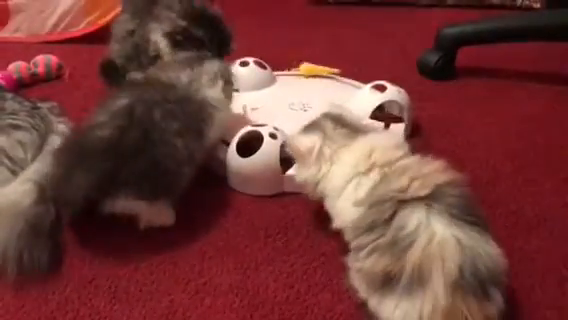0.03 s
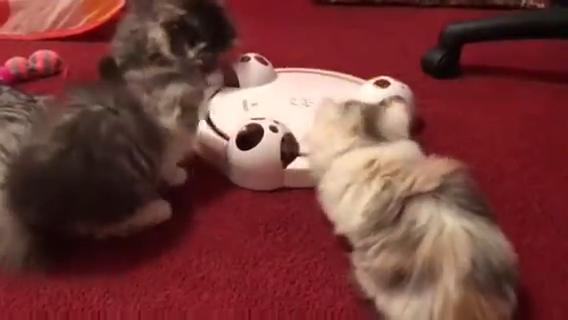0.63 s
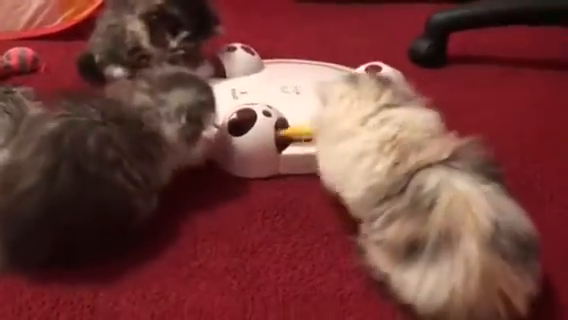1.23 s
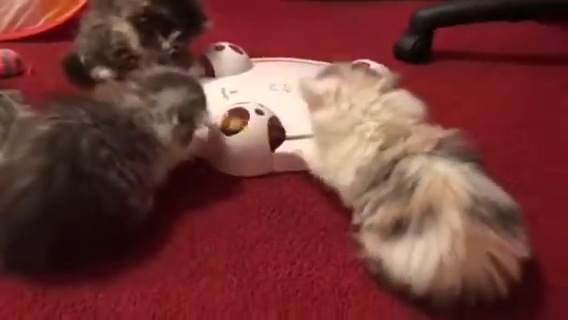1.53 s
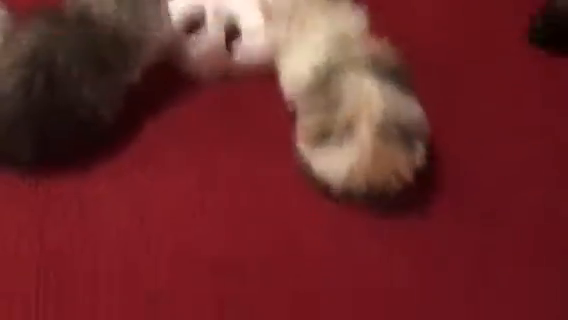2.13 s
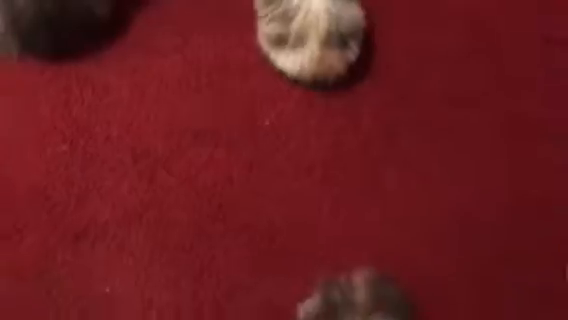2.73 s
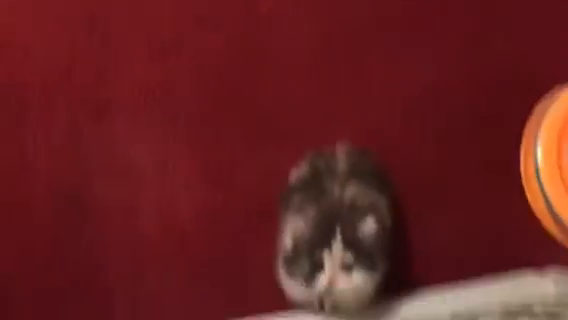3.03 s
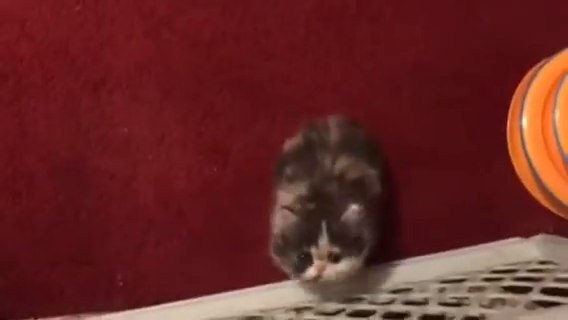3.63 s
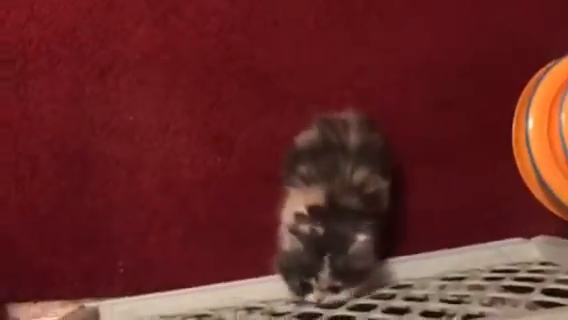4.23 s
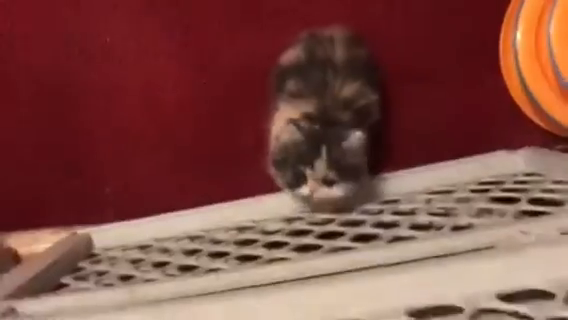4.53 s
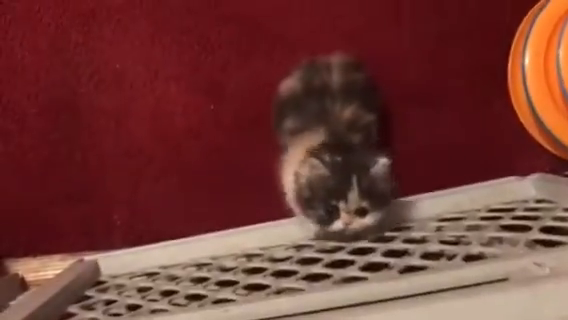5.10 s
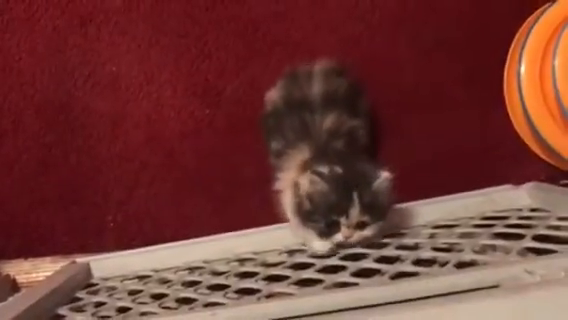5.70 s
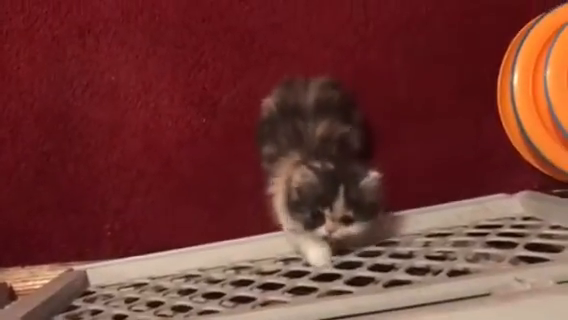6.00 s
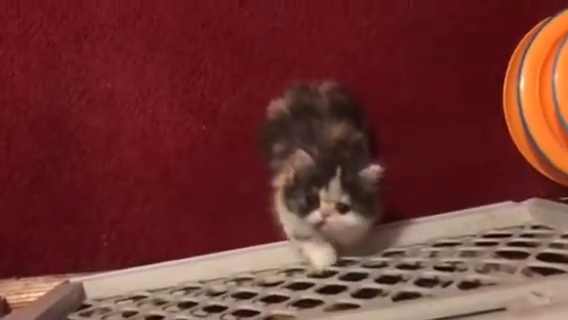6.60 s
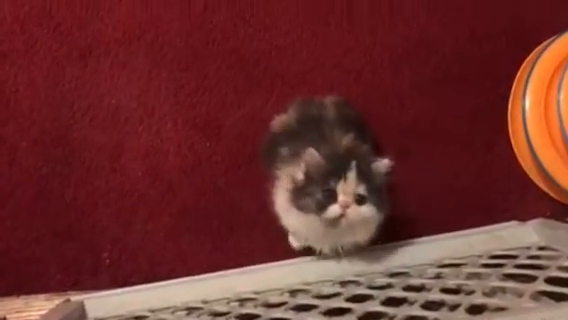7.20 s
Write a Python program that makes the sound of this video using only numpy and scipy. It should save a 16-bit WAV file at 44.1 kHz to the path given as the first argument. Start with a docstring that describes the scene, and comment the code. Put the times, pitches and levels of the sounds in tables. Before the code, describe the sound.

A small motorised toy whirs quietly with light plastic taps, broken by close microphone handling knocks, then soft scratches on a plastic gate.

```python
"""A motorised cat toy whirs on the carpet of a small room, its gear train buzzing in a plastic shell
while kittens bat at it and its loose wand rattles. The microphone is a hand-held phone nearby, which
swings round to a kitten pawing and scratching a plastic pet gate. Right at the microphone the grip
shifts: soft thumps, a short finger slide, rasping skin and sharp knocks on the case.
Low room tone lies underneath."""
import sys
import numpy as np
from scipy import signal
from scipy.fft import rfft, irfft, next_fast_len
from scipy.io import wavfile
from scipy.ndimage import uniform_filter1d, map_coordinates

SR = 44100
rng = np.random.default_rng(int(sys.argv[2]) if len(sys.argv) > 2 else 0)


def store_pcm(level_fs):
    """Save levels as 16-bit WAV."""
    pcm = np.round(np.clip(level_fs, -1, 1) * 32767).astype(np.int16)
    wavfile.write(sys.argv[1], SR, np.atleast_2d(pcm).T)


N = 324135
TIME = np.arange(N) / SR
HIT = 8192  # samples in one blow
TURN_MIDDLE_S, TURN_LENGTH_S = 2.8, 0.73  # the phone's swing from toy to gate

# resonances of the toy's plastic shell: f/Hz, gain/dB
TOY_SHELL = [(300, -16), (620, -9.5), (720, 1), (860, -14.5), (1040, -1), (1190, -8), (1350, 1),
             (1640, 4.5), (1800, -11), (2100, -22.5), (2780, -10.5), (3150, -19.5), (3700, -30),
             (7000, -47)]


def toy_motor(shaft_hz=43.7, pinion_teeth=6, wobble=0.004):
    """Loose gear teeth click into the shell, harder twice a turn; motor hum and gear whine sit beneath."""
    # course of the gear whir: t/s, relative level/dB
    whir_levels = [(0.0, -56.5), (0.37, -60.5), (0.57, -56.5), (2.19, -60), (2.83, -54.5), (3.13, -60),
                   (7.35, -60.5)]
    # partials of the motor hum: f/Hz, level/dB
    hum_partials = [(129.6, -64), (175, -70), (220, -68), (262, -88), (393, -74), (567, -77), (1550, -69),
                    (1642, -70), (5330, -100)]
    # partials of the gear whine: f/Hz, relative level/dB
    whine_partials = [(721, -4.5), (818, -17.5), (1049, 0), (1152, -23)]
    motor_time = np.cumsum(1 + wobble * (wander(9) + wander(1.5)) / 2) / SR
    turns = shaft_hz * motor_time
    backlash = 0.16 * wander(130)  # each tooth lands early or late
    meshes = np.diff(np.floor(turns * pinion_teeth + backlash), prepend=0)
    teeth = unit(meshes * undb(rng.uniform(-14, 0, N)))
    rubbing = undb(-1) * rng.standard_normal(N)
    eccentric = 1 + 0.17 * np.cos(4 * np.pi * turns)
    load = eccentric * undb(2.5 * wander(24))
    whir = unit(colour((teeth + rubbing) * load, TOY_SHELL))
    whir *= undb(np.interp(TIME, *np.transpose(whir_levels)) + 1)
    hum = sum(undb(db) * partial(hz * motor_time, spread=0.61, rate_hz=18) for hz, db in hum_partials)
    whine = sum(undb(db) * partial(hz * motor_time, spread=0.55, rate_hz=17)
                for hz, db in whine_partials)
    whine_db = -72.5 + 8.5 * turned(TIME)  # louder once the phone has swung round
    return whir + hum + whine * undb(whine_db)


def partial(cycles, spread, rate_hz):
    """A motor or gear tone of rms near 1 whose strength and phase flutter with the load."""
    flutter = 1 + spread * (wander(rate_hz) + 1j * wander(rate_hz))
    return np.sqrt(2) * unit(np.abs(flutter)) * np.sin(2 * np.pi * cycles + np.angle(flutter))


def toy_taps():
    """Paws and wand strike the toy's shell: a brief tap is bright, a longer one duller."""
    # blows on the shell: t/s, level/dB, rattle decay/s
    taps = [(.142, -47.5, 0.004), (0.635, -46.5, 0.029), (.679, -39, 0.0077), (.737, -38, .018),
            (.942, -42.5, 0.00076), (1.057, -43, 0.0015), (1.138, -48, 0.0067), (1.263, -46.5, 0.0026),
            (1.345, -49, 0.006), (1.931, -47.5, 0.0046), (2.362, -47.5, 0.011), (2.502, -40, 0.0075),
            (2.575, -36, 0.0042), (2.582, -48, 0.013), (2.601, -42.5, .0095), (2.688, -39.5, 0.01),
            (2.95, -42.5, 0.016)]
    out = np.zeros(N)
    for s, db, rattle_s in taps:
        tilt = 1 - 1.56 * np.log2(rattle_s / 0.0021)
        add(out, s, colour(contact(rattle_s, chatter=0.092), TOY_SHELL, tilt), db)
    return out


def wand_rattle(count=64):
    """The loose, circling wand clicks in the shell at random, fainter as the microphone turns away."""
    out = np.zeros(N)
    for k, (when, softness) in enumerate(rng.random((count, 2))):
        s = (k + when) / count * N / SR
        db = -51 - 5.5 * turned(s) - 5 * softness
        add(out, s, colour(contact(0.0054, chatter=0.22), TOY_SHELL, tilt_db_per_octave=3.5), db)
    return out


def gate_taps(scuff_db=2):
    """The gate's plastic lattice rings briefly under claws, nose and scuffing paws."""
    # touches on the gate: t/s, level/dB, rattle decay/s
    taps = [(3.496, -41.5, .0044), (5.114, -46, 0.0085), (5.317, -39, 0.024), (5.490, -42.5, 0.014),
            (5.519, -37.5, 0.012), (5.569, -47.5, 0.025), (6.244, -42, 0.038), (6.899, -49, 0.0038)]
    # modes of the lattice: f/Hz, relative level/dB, t60/s
    modes = [(694, 3.5, 0.067), (736, -3, 0.048), (795, -14, 0.017), (982, -3.5, 0.1), (1125, 1, 0.032),
             (1242, 2.5, 0.065), (1520, -3, 0.064), (1780, -19, 0.012), (2760, -5, 0.021),
             (3130, -13, 0.033), (4330, -39, 0.0091)]
    # dry scuff of a paw: f/Hz, gain/dB
    scuff = [(300, -26), (560, -11), (700, 10.5), (900, -1.5), (1150, -5), (1600, -1.5), (2000, -22),
             (2800, -8), (3500, -29), (8000, -43)]
    out = np.zeros(N)
    for s, db, rattle_s in taps:
        push = contact(rattle_s, chatter=0.048)
        tap = unit(ring(push, modes)) + undb(scuff_db) * unit(colour(push, scuff))
        add(out, s, colour(tap, [(400, -22), (650, 0.5), (6000, -11)]), db)
    return out


def fur_brush():
    """Fur brushes past the gate in one soft hiss."""
    # the stroke: t/s, length/s, level/dB
    brush = [(5.22, 0.04, -53.5)]
    # fur on plastic: f/Hz, gain/dB
    fur = [(500, -5), (1400, 12), (2000, -6), (2800, 6), (4200, -20), (6000, -13), (8000, -24),
           (14000, -30)]
    return unit(colour(rng.standard_normal(N), fur)) * strokes(brush, attack_s=0.035, sag_db_per_s=0)


def claw_scratches(ring_hz=2735):
    """Claw tips scrape briefly over plastic."""
    # light scratches: t/s, level/dB
    scratches = [(3.707, -49.5), (3.78, -48.5), (4.026, -46), (5.557, -50), (6.422, -52), (6.501, -46),
                 (6.546, -50.5)]
    # spectrum of a scratch: f/ring_hz, gain/dB
    claw = [(.22, -2), (.44, 10.5), (.7, 6.5), (.84, -15), (1.0, 8), (1.2, -9), (1.45, -31), (3.3, -35)]
    out = np.zeros(N)
    for s, db in scratches:
        add(out, s, colour(contact(0.0044, chatter=0.7), np.array(claw) * [ring_hz, 1]), db)
    return out


def case_knocks(ring_db=-3):
    """Fingers knock on the phone, right at the microphone: a dry click and the ring of the case."""
    # knocks: t/s, level/dB, rattle decay/s, treble tilt/(dB per octave)
    knocks = [(2.707, -30, 0.011, -3), (2.717, -23.5, .013, -6), (2.746, -37, 0.027, -6),
              (2.81, -45, 0.012, 8.5), (4.3137, -19, 0.00053, 2.5), (4.446, -33.5, 0.003, 9),
              (4.470, -26, 0.0012, -7.5), (4.4727, -13, 0.0059, -1.5), (4.479, -24.5, 0.0095, -2.5),
              (4.498, -30.5, 0.0098, -1.5)]
    # modes of the case: f/Hz, relative level/dB, t60/s
    modes = [(430, -15.5, 0.04), (672, -6, 0.062), (900, 7.5, 0.0072), (1196, 3, 0.02), (1270, 8, 0.014),
             (1509, 7, 0.027), (1532, 3.5, 0.073), (1900, -7, 0.058), (2180, -5.5, 0.032),
             (2480, -13, 0.027), (2830, -11, 0.023), (2925, -1, 0.028), (3750, -24, 0.033),
             (3700, -15, 0.021), (4770, -16, 0.016), (6900, -37, .04)]
    # dry click of a touch: f/Hz, gain/dB
    click = [(150, -4), (300, -19), (420, -13), (800, -20.5), (1150, -1), (1450, 6), (1760, -28),
             (2000, -15), (2750, -5.5), (3300, -13), (4300, -24), (5700, -34.5), (7100, -36), (15000, -49)]
    body = [(60, -7.5), (200, 7.5), (600, 6), (1500, 5.5), (15000, -6)]  # f/Hz, gain/dB
    out = np.zeros(N)
    for s, db, rattle_s, tilt in knocks:
        push = contact(rattle_s, chatter=0.12)
        knock = unit(colour(push, click)) + undb(ring_db) * unit(ring(push, modes))
        add(out, s, colour(knock, body, tilt), db)
    return out


def hand_thumps(swell_cycles=0.67, flesh_db=-11):
    """The hand's weight pushes through the phone; each low thump swells and dies in a few cycles."""
    # shifts of the grip: t/s, level/dB, f/Hz
    thumps = [(0.655, -42.5, 75.6), (0.768, -38.5, 66.4), (1.425, -33.5, 66), (1.596, -43, 75.5),
              (2.261, -39, 65), (2.352, -44.5, 58.5), (2.713, -42, 96), (2.845, -36, 61.3),
              (3.002, -41.5, 64), (3.078, -41.5, 64), (3.637, -43, 99), (4.312, -27.5, 84),
              (4.365, -34, 79), (4.401, -31, 49), (4.456, -21.5, 85), (4.473, -26.5, 63.6)]
    flesh_colour = [(20, -7.5), (60, -13.5), (150, 1.5), (300, -21.5), (1500, -65)]  # f/Hz, gain/dB
    out = np.zeros(N)
    for s, db, hz in thumps + fidgets():
        age = TIME[:HIT] * hz / swell_cycles
        flesh = undb(flesh_db) * unit(colour(rng.standard_normal(HIT), flesh_colour))
        add(out, s, age * np.exp(-age) * (np.sin(2 * np.pi * hz * TIME[:HIT]) + flesh), db)
    return out


def fidgets(count=12, from_s=0.9, db=-47.5, hz=70):
    """The restless hand adds faint, uneven thumps until mid-swing: rows of t/s, level/dB, f/Hz."""
    step_s = (TURN_MIDDLE_S - from_s) / count
    return [(from_s + (k + when) * step_s, db + 3.5 * (2 * force - 1), hz * 2 ** (pitch - 0.5))
            for k, (when, force, pitch) in enumerate(rng.random((count, 3)))]


def finger_slide():
    """A finger slides a short way along the phone case."""
    # the slide: t/s, length/s, level/dB
    slide = [(4.312, 0.097, -32)]
    # skin on the case: f/Hz, gain/dB
    spectrum = [(59, -24), (100, 3), (339, -13.5), (416, -4.5), (545, -20.5), (698, -10), (914, -27),
                (1030, -9.5), (1170, -19.5), (1440, -5), (1660, -30), (2270, -28), (2570, -19.5),
                (3650, -43), (14000, -62.5)]
    return rub(slide, spectrum, sag_db_per_s=52)


def port_rasp():
    """Skin rasps straight over the microphone port as the grip shifts."""
    # rasps: t/s, length/s, level/dB
    rasps = [(2.715, 0.039, -43.5), (4.442, 0.027, -43), (4.469, 0.047, -21)]
    # skin on the port: f/Hz, gain/dB
    spectrum = [(500, -11.5), (1200, 11.5), (1480, 13), (1750, -5), (2800, 12), (3400, -10), (4500, 0.5),
                (5600, -26.5), (7000, -12.5), (9500, -24), (15000, -30)]
    return rub(rasps, spectrum, sag_db_per_s=458)


def faint_ticks(count=14, db=-68, spread_db=2):
    """Now and then something in the room gives a tiny high tick."""
    # spectrum of a tick: f/Hz, gain/dB
    spectrum = [(1000, -25), (3500, -6), (5200, 8), (7000, 0), (9000, -14), (15000, -7)]
    out = np.zeros(N)
    for when, force in rng.random((count, 2)):
        tick = colour(contact(0.0004, chatter=0.25), spectrum)
        add(out, when * N / SR, tick, db + spread_db * (2 * force - 1))
    return out


def walls(x, t60_s=0.077, wet_db=-9):
    """The small carpeted room adds a short tail, starting 6 ms after the direct sound."""
    age = TIME[:2 * HIT]
    tail = rng.standard_normal(len(age)) * np.exp(-np.log(1000) * age / t60_s) * (age > 0.006)
    response = colour(unit(tail) / np.sqrt(len(age)), [(2000, 0), (10000, -0.5)])
    return x + undb(wet_db) * signal.fftconvolve(x, response)[:N]


def room_tone(level_db=-56.5, swell_db=3):
    """A low, gently swelling rumble under an even hiss."""
    # noise of the room: f/Hz, relative spectral density/dB
    spectrum = [(15, -15.5), (30, -4), (55, -0.5), (130, -2), (200, -5), (300, -10), (500, -16),
                (1200, -12.5), (2200, -26.5), (3800, -38), (7500, -42), (15500, -40.5)]
    air = unit(colour(rng.standard_normal(N), spectrum))
    rumble = signal.sosfiltfilt(signal.butter(2, 250, fs=SR, output="sos"), air)
    return undb(level_db) * (air + rumble * (undb(swell_db * wander(4.47)) - 1))


def contact(rattle_s, chatter):
    """One sharp touch, then dying micro-impacts as the surfaces settle."""
    push = chatter * rng.standard_normal(HIT) * rng.exponential(size=HIT)
    push *= np.exp(-TIME[:HIT] / rattle_s)
    push[0] += 1
    return push


def ring(push, modes, scatter_db=1):
    """Drive decaying modes; each blow lands elsewhere and weights them anew."""
    hz, db, t60 = np.transpose(modes)[:, :, None]
    weight = undb(db + scatter_db * rng.standard_normal(hz.shape)) * rng.choice([-1, 1], hz.shape)
    response = weight * np.sin(2 * np.pi * hz * TIME[:HIT]) * np.exp(-np.log(1000) * TIME[:HIT] / t60)
    return signal.fftconvolve(push, response.sum(0))[:HIT]


def rub(rows, spectrum, sag_db_per_s, slip_db=5):
    """Skin sticks and slips in tiny uneven steps."""
    slips = rng.standard_normal(N) * undb(slip_db * rng.standard_normal(N))
    return unit(colour(slips, spectrum)) * strokes(rows, attack_s=0.0035, sag_db_per_s=sag_db_per_s)


def strokes(rows, attack_s, sag_db_per_s, lift_db_per_s=3998):
    """Envelope of strokes that bite, weaken as the pressure eases and stop on lifting."""
    out = np.zeros(N)
    for s, length_s, db in rows:
        age = np.clip(TIME - s, 0, 1)
        sag_db = sag_db_per_s * np.maximum(age - attack_s, 0)
        lift_db = lift_db_per_s * np.maximum(age - length_s, 0)
        out += np.minimum(age / attack_s, 1) * undb(db - np.minimum(sag_db + lift_db, 200))
    return out


def turned(s):
    """How far the microphone has swung from toy to gate, 0-1."""
    return np.clip(0.5 + (s - TURN_MIDDLE_S) / TURN_LENGTH_S, 0, 1)


def colour(x, points, tilt_db_per_octave=0):
    """Causal filter through (f/Hz, gain/dB) points, tilted about 1500 Hz."""
    size = 2 * next_fast_len(len(x))
    hz = np.maximum(np.arange(size // 2 + 1) * SR / size, 1)
    corners, db = np.transpose(points)
    octaves = np.log2(np.clip(hz, 600, 3600) / 1500)
    gain_db = np.interp(np.log(hz), np.log(corners), db) + tilt_db_per_octave * octaves
    # folding the cepstrum gives minimum phase
    cepstrum = irfft(np.log(undb(gain_db)))
    cepstrum[1:size // 2] *= 2
    cepstrum[size // 2 + 1:] = 0
    return irfft(rfft(x, size) * np.exp(rfft(cepstrum)))[:len(x)]


def add(out, s, sound, db):
    """Mix a sound in at time s; db is the level of its loudest 4 ms."""
    start = max(int(s * SR), 0)
    loudest = np.sqrt(uniform_filter1d(sound ** 2, size=176).max())
    out[start:start + len(sound)] += (undb(db) * sound / loudest)[:N - start]


def wander(rate_hz):
    """Smooth random drift with spread near 1."""
    steps = rng.standard_normal(1024)
    coarse = TIME[::32]
    return np.interp(TIME, coarse, map_coordinates(steps, [coarse * rate_hz], order=3, mode="wrap"))


def undb(db):
    """Decibels to gain."""
    return 10 ** (np.asarray(db) / 20)


def unit(x):
    """Scale to rms 1."""
    return x / np.sqrt(np.mean(x ** 2))


def scene():
    """Mono, from the hand: the motor and handling are dry; the kittens' play carries the room's tail."""
    motor = toy_motor()
    play = toy_taps() + wand_rattle() + gate_taps() + fur_brush() + claw_scratches()
    in_room = walls(play + faint_ticks())
    handling = case_knocks() + hand_thumps() + finger_slide() + port_rasp()
    return (motor + in_room + handling + room_tone())[None]


def record(dry, low_cut_hz=28, top_hz=15700):
    """The microphone port ripples the treble; the phone cuts the deepest bass and the top."""
    # response of the microphone port: f/Hz, gain/dB
    port = [(4900, -0.5), (5300, 2), (5700, 0.5), (7100, -0.5), (7800, -3.5), (8800, -1.5), (9700, 0),
            (10400, -7), (11500, -2.5)]
    low_cut = signal.butter(2, low_cut_hz, "highpass", fs=SR, output="sos")
    high_cut = signal.ellip(10, 0.1, 80, top_hz, fs=SR, output="sos")
    return signal.sosfilt(high_cut, signal.sosfilt(low_cut, colour(dry[0], port)))[None]


dry = scene()
out = record(dry)
store_pcm(out)
```